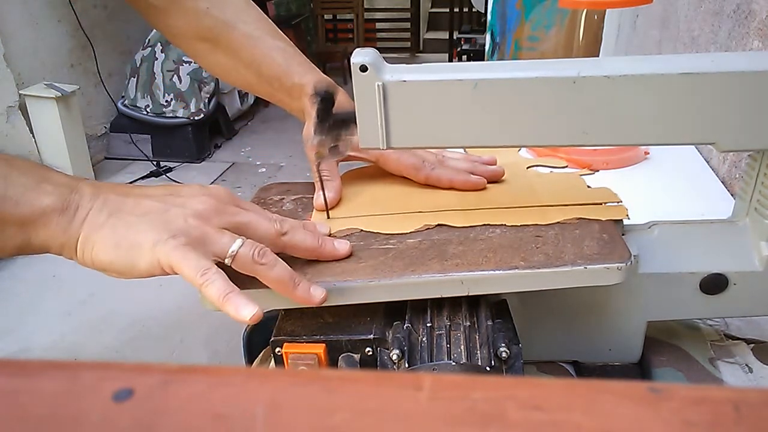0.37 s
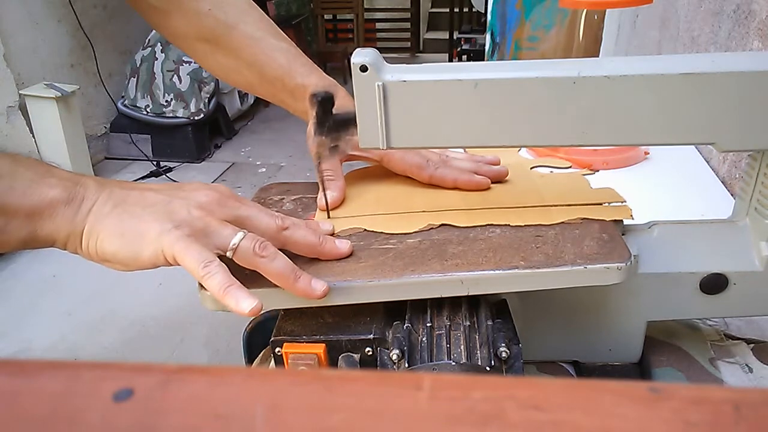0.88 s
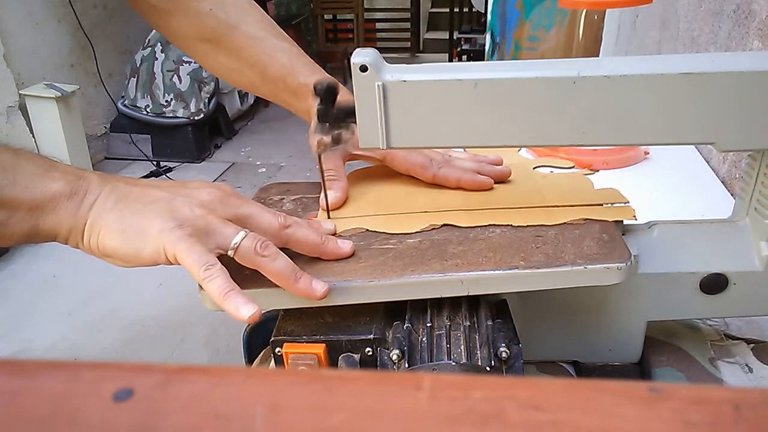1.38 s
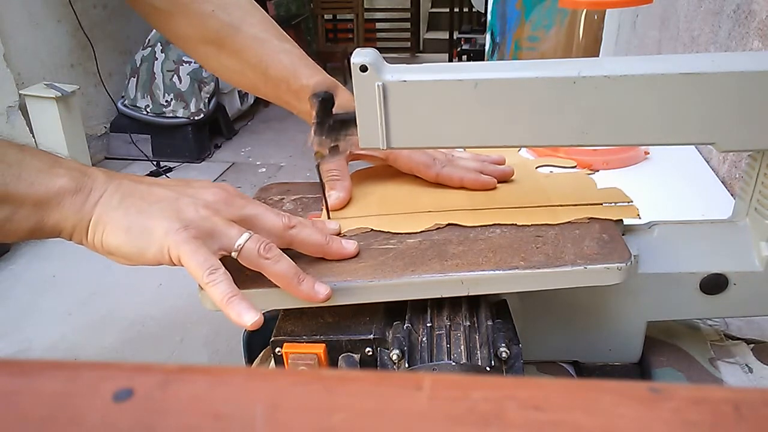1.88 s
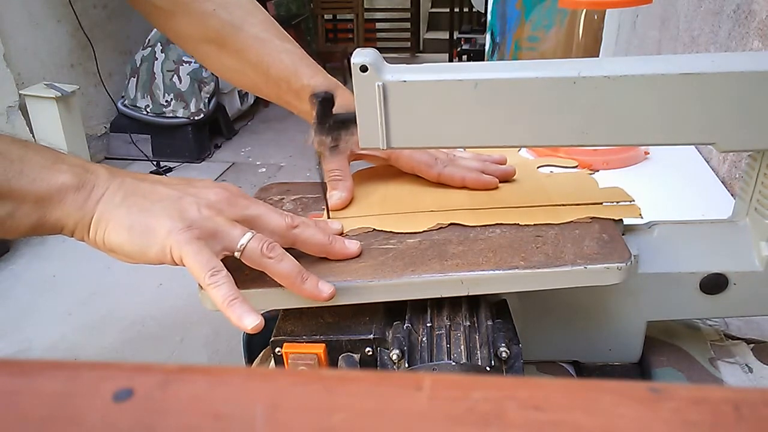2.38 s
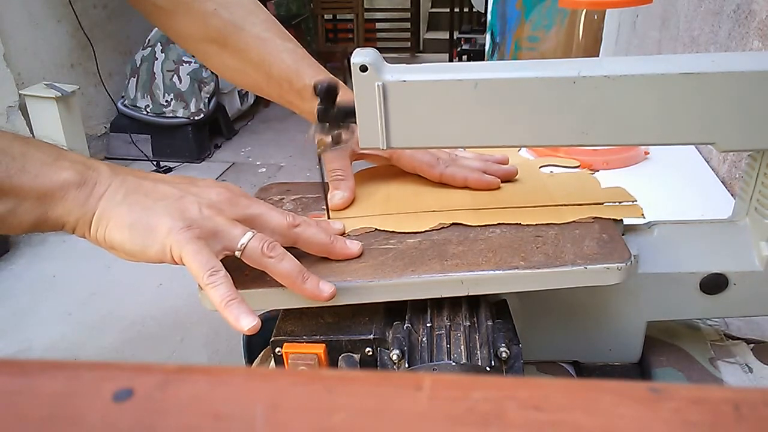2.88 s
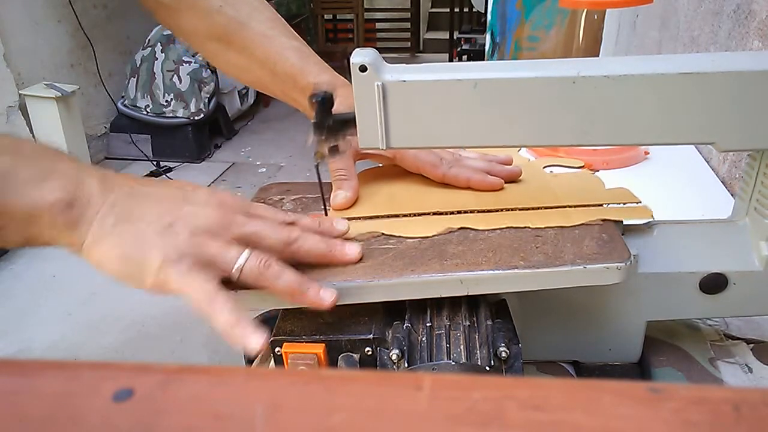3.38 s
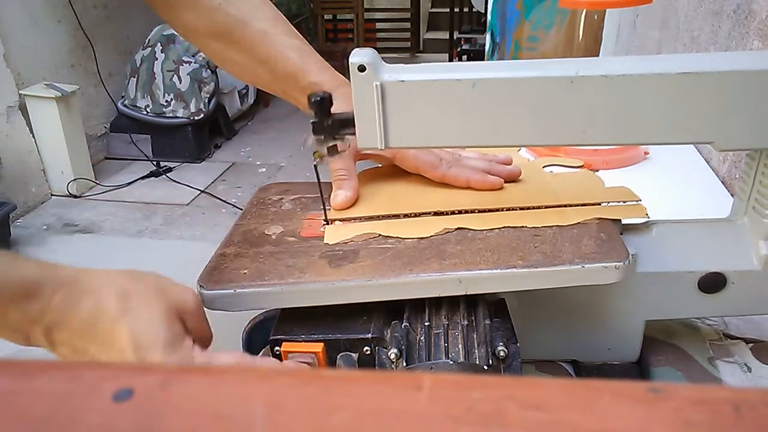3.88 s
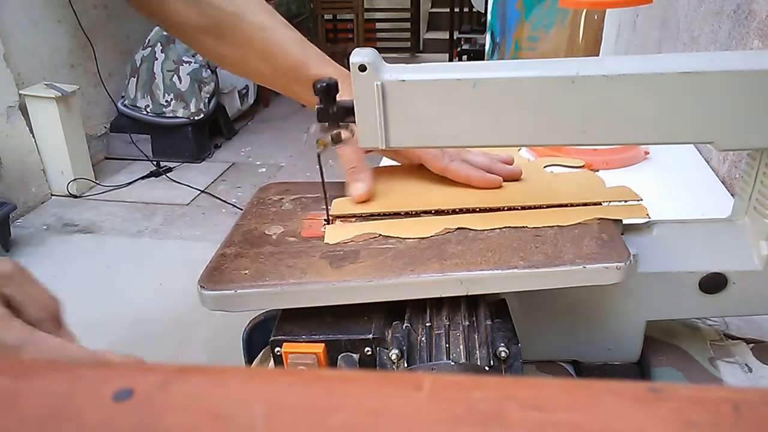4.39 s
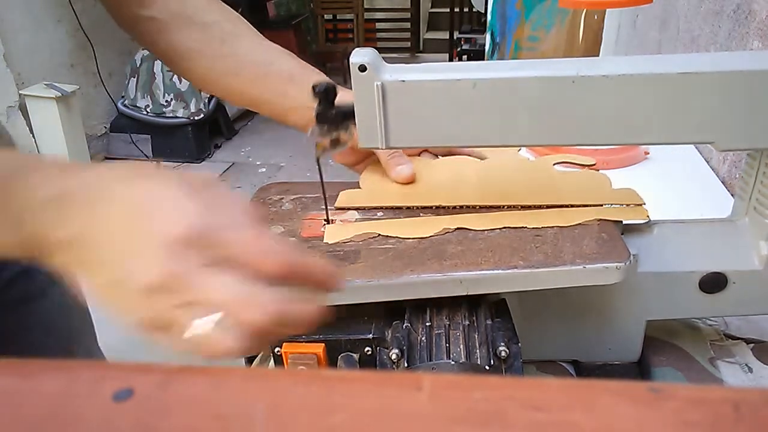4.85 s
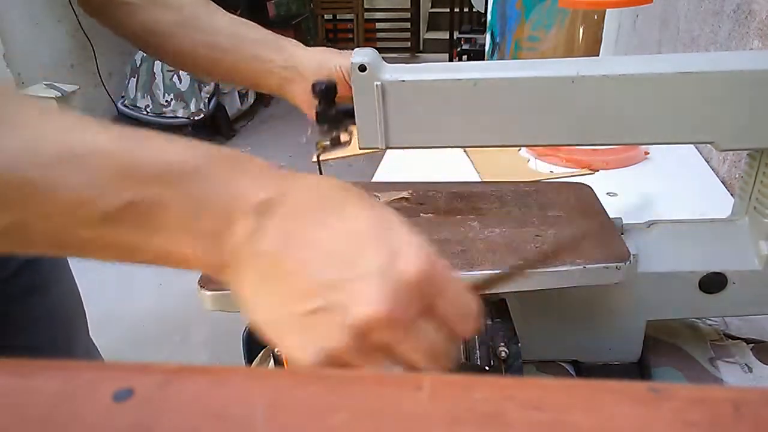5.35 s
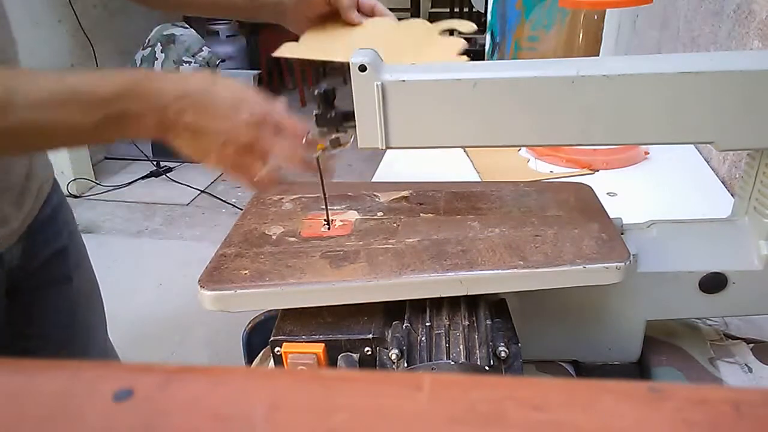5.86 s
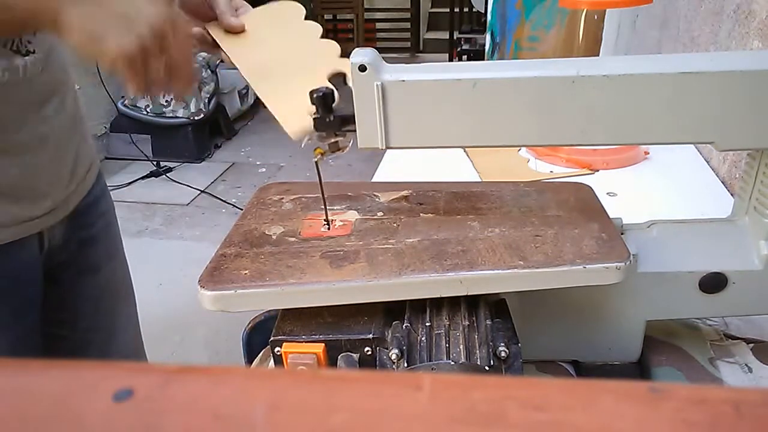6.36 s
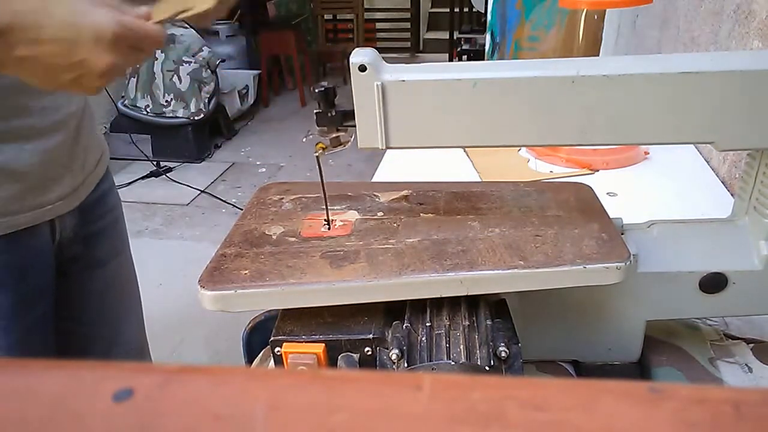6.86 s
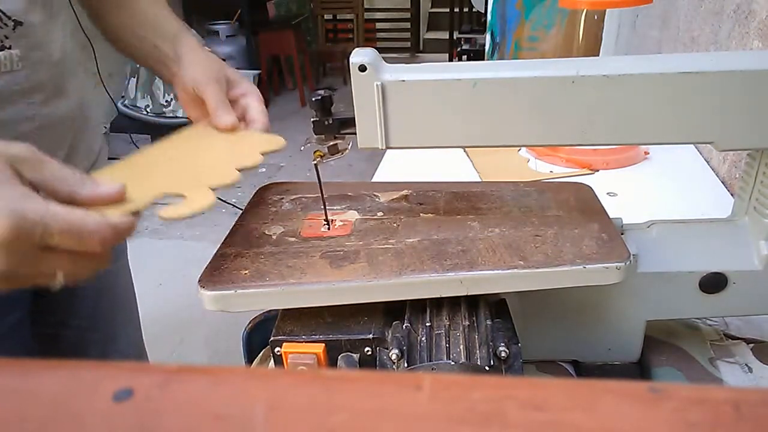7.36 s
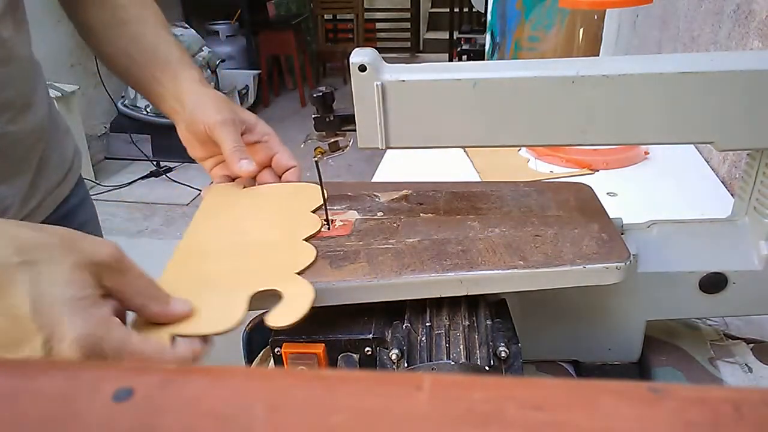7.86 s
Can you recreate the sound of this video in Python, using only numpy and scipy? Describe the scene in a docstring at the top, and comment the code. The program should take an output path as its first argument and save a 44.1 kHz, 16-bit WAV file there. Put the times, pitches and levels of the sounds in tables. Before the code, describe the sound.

From 0 to 1.9 s a bench scroll saw cuts thin plywood close to the microphone: about 29 strokes a second fuse into a rough, loud buzz of board slaps, arm knocks, blade ringing and toothy rasp, its force and hum fluctuating. From 1.9 to 2.5 s it runs free, with bright metal clatter and motor whirr. At 2.5 s it is switched off; the pitch drops and the clacks separate, slowing and fading until about 4.3 s, with a small dull knock at 4.45 s. Then it is quiet, with a faint low outdoor murmur. A light knock at 4.95 s, a sharper knock and gritty wood slide at 5.2 s, a softer rub near 5.5 s, and faint ticks at 5.8 and 6.3 s follow. A distant hoarse bird whistles from 5.9 s, with a falling note at 7.2 s and short chirps near 7.7 s. Hollow board knocks land at 7.1 s. Short workshop reverberation.

```python
"""Scroll saw, handled board and a bird

A bench scroll saw cuts plywood, runs free, is switched off and its crank winds down with slowing clacks.
Impulses and noise excite decaying modes of board, arm, blade and frame; filtered noise gives rasp and whirr.
Hands then slide and knock the board (gritty noise and modes) while small metal parts tick.
A bird whistles outside (gliding sines with echoes) over a low murmur; a noise suppressor thins the quiet."""
import sys
import numpy as np
from scipy import signal
from scipy.fft import rfft, irfft, next_fast_len
from scipy.io import wavfile
from scipy.ndimage import uniform_filter1d

SR = 44100
rng = np.random.default_rng(int(sys.argv[2]) if len(sys.argv) > 2 else 0)


def unload_wav(signal):
    """Save mono or channel-first audio to the path in sys.argv[1] as 16-bit WAV at rate SR, clipped to [-1, 1]."""
    wavfile.write(
        sys.argv[1],
        SR,
        np.round(np.clip(np.atleast_2d(signal).T, -1, 1) * 32767).astype(np.int16),
    )


def gain_from_decibels(decibels):
    """Convert decibel values to linear amplitude factors."""
    exponent = np.asarray(decibels, float) / 20
    return 10 ** exponent


N = 352359
T = np.arange(N) / SR  # time [s]

# crank speed: steady under load, a little faster free, a sharp drop at switch-off, then coasting:
# (time [s], speed [turns/s])
CRANK_SPEED = [(0, 28.69), (1.9, 28.69), (2.49, 28.95), (2.53, 19.89), (2.7, 18.03), (3.1, 14.35),
               (3.5, 11.6), (3.73, 10.0), (3.85, 9.6), (4.2, 7.25), (4.6, 6.9)]
# modes of the cast frame: (frequency [Hz], relative level [dB], t60 [s])
LOW_FRAME_MODES = [(836, -8, 0.15), (895, -10, 0.15), (1264, -9, 0.04), (1600, -4, 0.04), (1860, 1, 0.08),
                   (2155, 5, 0.09), (2230, 0, 0.05), (2470, 0, 0.07)]  # rung by every blow in the linkage
CLACK_FRAME_MODES = [(4360, 0, .1), (4500, -5, .05), (4850, -4, .07), (5100, -3, .05), (5280, -1, .09),
                     (5670, -7, .07), (6270, -9, .06), (6540, -5, .1), (6940, -10, .06), (7300, -6, .05),
                     (7450, -3, .08), (8390, -13, .06), (10100, -24, .1)]  # rung by the clacks
REBOUND_FRAME_MODES = [(3150, -2, .11), (3570, -3, .07), (3800, -2, .1), (4600, -7, .07), (5900, -10, .06)]  # rung by the rebounds and stray rattles
CUT_ENDS_TURN = 54  # turns of the crank spent cutting
CLACK_TURN = 0.38  # place of the clack on the crank [turns]


def evened(x):
    """Normalisation: scales a signal to an rms of 1."""
    return x / np.sqrt(np.mean(x ** 2) + 1e-20)


def level(rows, column):
    """Envelope: the gain along one dB column, silent outside the table."""
    rows = np.array(rows)
    return gain_from_decibels(np.interp(T, rows[:, 0], rows[:, column], -200, -200))


def coloured(x, points):
    """Spectral shaping: weights x by (frequency [Hz], level [dB]) points, to an rms of 1."""
    hz, db = np.transpose(points)
    size = next_fast_len(N)
    bins_hz = np.fft.rfftfreq(size, 1 / SR)
    gain = gain_from_decibels(np.interp(np.log(bins_hz + 1), np.log(hz + 1), db))
    return evened(irfft(rfft(x, size) * gain, size)[:N])


def band(x, lo_hz, hi_hz):
    """Band limitation: a steep band-pass, to an rms of 1."""
    sos = signal.butter(3, [lo_hz, hi_hz], "band", fs=SR, output="sos")
    return evened(signal.sosfilt(sos, x))


def ring(x, modes):
    """Modal resonance: convolves the excitation with a sum of exponentially decaying sines."""
    t = T[:SR // 3]
    response = sum(gain_from_decibels(db - 60 * t / t60) * np.sin(2 * np.pi * hz * t) for hz, db, t60 in modes)
    return signal.oaconvolve(x, response)[:N]


def blows(times, db, rise_s=0., fall_s=1e-5):
    """Impulsive excitation: an envelope rises and falls at each time, by default a single click."""
    train, t = np.zeros(N), T[:SR // 3]
    places = np.clip(np.round(np.asarray(times) * SR).astype(int), 0, N - 1)
    np.add.at(train, places, gain_from_decibels(db))
    rise = np.minimum((t * SR + 1) / (rise_s * SR + 1), 1)
    return signal.oaconvolve(train, rise * np.exp(-t / fall_s))[:N]


def strike(times, db, modes, uneven_db, fall_s, rise_s=0.0019):
    """Contact chatter: each blow is a short lumpy rattle that wakes every mode by a different amount."""
    spread = uneven_db * rng.standard_normal((len(times), len(modes)))
    a, b = rng.standard_normal((2, N))
    rattle = evened(a * gain_from_decibels(3 * evened(uniform_filter1d(b, size=50))))
    return sum(ring(rattle * blows(times, db + spread[:, k], rise_s, fall_s), [mode])
               for k, mode in enumerate(modes))


def patchy(x, depth_db, bins, frames):
    """Spectral fluctuation: raises and lowers random patches of time and frequency."""
    z = signal.stft(x, nperseg=512)[2]
    patches = uniform_filter1d(rng.standard_normal(z.shape), size=bins, axis=0)
    patches = evened(uniform_filter1d(patches, size=frames, axis=1))
    return evened(signal.istft(z * gain_from_decibels(depth_db * patches), nperseg=512)[1][:N])


def gritty_noise():
    """Stick-slip friction: noise whose loudness fluctuates within milliseconds."""
    lumps = evened(uniform_filter1d(rng.standard_normal(N), size=60))
    return rng.standard_normal(N) * gain_from_decibels(4 * lumps)


def tail(x, t60):
    """Diffuse reverberation: dense reflections decay exponentially, the treble twice as fast."""
    t = T[:SR // 2]
    a, b = rng.standard_normal((2, len(t))) * (t > .004)
    dull = uniform_filter1d(a, size=5) * gain_from_decibels(-60 * t / t60)
    bright = .8 * b * gain_from_decibels(-60 * t / (.5 * t60))
    taps = dull + bright
    return signal.oaconvolve(x, taps / np.linalg.norm(taps))[:N]


def crank_turns():
    """Kinematics: the turns made by the crank are the integral of its speed."""
    return np.cumsum(np.interp(T, *np.transpose(CRANK_SPEED))) / SR


def at_turns(turns):
    """Inverse kinematics: the times at which the crank reaches given numbers of turns."""
    return np.interp(turns, crank_turns(), T)


def cutting():
    """Periodic impact: each stroke slaps the board down and the arm knocks a third of a turn later."""
    # how hard the board slaps the table as the hands press and ease: (time [s], relative level [dB])
    slap_force = [(0, -8), (.11, -15), (.2, 3), (.44, 0.5), (.53, -1), (.62, -1), (.83, 1.5), (.93, -5),
                  (1.0, -2.5), (1.13, -4.5), (1.25, 0.5), (1.36, 0), (1.45, -4.5), (1.67, 2), (1.72, -6),
                  (1.85, -1.5), (1.9, -13.5)]
    # while cutting: (time [s], steady board ring [dB], steady arm ring [dB], teeth [dB]), all relative
    cut_levels = [(0.0, -10.5, -21, -18), (0.202, -28, -19.5, -22.5), (0.39, -19, -24.5, -20.5),
                  (1.042, -34, -21.5, -22.5), (1.486, -26.5, -24, -21), (1.656, -20, -19, -20),
                  (1.92, -28.5, -30, -22.5)]
    slap_turn = 0.94  # place on the crank
    slaps = at_turns(np.arange(CUT_ENDS_TURN) + slap_turn)
    chance = rng.standard_normal((len(slaps), 3))
    slap_db = np.interp(slaps, *np.transpose(slap_force)) + 1.2 * chance[:, 0]
    knock_s = slaps + .0122 + .0004 * chance[:, 1]
    knock_db = -5.5 + 0.77 * slap_db + 1.5 * chance[:, 2]
    slapping = blows(slaps - .0022, slap_db, .003, .003)
    knocking = blows(knock_s - .0005, knock_db - 1, .0008, .0014)
    out = board(slaps, knock_s, knock_db, level(cut_levels, 1)) + table_hum()
    out += arm(slaps, slap_db, knock_s, knock_db, level(cut_levels, 2))
    return out + blade(slapping, knocking) + teeth(slapping, knocking, knock_s, level(cut_levels, 3))


def board(slaps, knock_s, knock_db, steady):
    """Plate modes: drops onto the table and steady noise make the board boom."""
    # the board lifts off the table and drops back: (time [s], relative level [dB])
    thud_force = [(0, -10.5), (.15, -4.5), (.22, 2.5), (.55, -1), (.85, -0.5), (.92, -7.5), (1.05, -1),
                  (1.12, -7), (1.17, -6.5), (1.22, 1), (1.45, -1), (1.5, -4), (1.67, -0.5), (1.72, -16.5),
                  (1.78, -10.5), (1.82, -8), (1.9, -8.5)]
    # modes of the board: (frequency [Hz], relative level [dB], t60 [s])
    board_modes = [(303, -7, 0.15), (588, -7, .06), (657, -7, 0.08), (762, -3, 0.05), (822, 0, 0.07),
                   (990, -9, 0.06), (1233, -14, 0.05)]
    thud_db = np.interp(slaps, *np.transpose(thud_force))
    thud = blows(slaps - .0005, thud_db, .0004, .0003) + blows(knock_s, knock_db - 8, .0004, .0003)
    boom = 0.03 * ring(band(thud, 630, 2700) * thud.std(), board_modes)
    noise = band(rng.standard_normal(N), 400, 3000)
    return boom + 0.27 * evened(ring(noise, board_modes)) * steady


def table_hum():
    """Harmonic of rotation: the table hums on the twelfth multiple of the crank speed."""
    # (time [s], peak level [dB])
    hum_levels = [(0, -52.5), (.3, -47), (.4, -34), (.72, -39.5), (1.0, -33), (1.15, -36), (1.33, -42.5),
                  (1.38, -29.5), (1.65, -32), (1.72, -44.5), (1.84, -44), (1.88, -25.5), (1.95, -81),
                  (2.3, -37), (2.4, -36.5), (2.5, -39)]
    return np.sin(2 * np.pi * 12 * crank_turns()) * uniform_filter1d(level(hum_levels, 1), size=500)


def arm(slaps, slap_db, knock_s, knock_db, steady):
    """Beam modes: sharp knocks, slap noise and steady noise ring the saw's arm."""
    # modes of the arm: (frequency [Hz], relative level [dB], t60 [s])
    arm_modes = [(1527, -7.5, 0.046), (1760, -8.5, 0.041), (1838, 3.5, 0.031), (1906, -7, .05),
                 (2133, -2.5, 0.046), (2400, -3.5, 0.042)]
    noise = rng.standard_normal(N)
    hits = 0.6 * blows(knock_s, knock_db, .00006, .00007)
    hits += 0.021 * band(noise, 500, 6000) * blows(slaps - .0015, slap_db, 0.00039, 0.0058)
    return 0.22 * ring(hits, arm_modes) + 0.62 * evened(ring(noise, arm_modes)) * steady


def blade(slapping, knocking):
    """Damped resonance: bursts of noise ring the blade, wider resonances dying sooner."""
    # resonances of the blade: (frequency [Hz], bandwidth [Hz], relative level [dB])
    blade_resonances = [(3630, 420, -6), (4350, 510, -5), (4683, 280, -1), (5200, 300, -8),
                        (6060, 360, -7.5), (6840, 2000, -27.5), (10000, 600, -18.5)]
    modes = [(hz, db, np.log(1000) / np.pi / width) for hz, width, db in blade_resonances]
    noise = band(rng.standard_normal(N), 1400, 10000)
    return 0.13 * ring(0.62 * noise * (slapping + 0.44 * knocking), modes)


def teeth(slapping, knocking, knock_s, steady):
    """Modulated friction noise: the teeth rasp through the wood and bite on the way down."""
    # spectrum of the rasp: (frequency [Hz], relative density [dB per Hz])
    rasp_spectrum = [(50, -25), (120, -20.5), (200, -35.5), (340, -8.5), (450, -22.5), (800, -3.5),
                     (1150, -4), (1830, 0), (2700, -3.5), (4750, -7), (7500, -15), (10900, -33.5),
                     (12000, -38), (15500, -37)]
    downstroke = .65 + .9 * blows(knock_s, 0., .003, .01)
    rasp = .3 * (slapping + 2.0 * knocking) + 1.01 * downstroke * steady
    return coloured(rng.standard_normal(N), rasp_spectrum) * rasp


def air():
    """Shaped random noise: a distant low outdoor murmur in drifting patches."""
    # spectrum of the murmur: (frequency [Hz], relative density [dB per Hz])
    murmur_spectrum = [(59, -4.5), (120, 10.5), (190, -13), (248, -5), (331, -6), (453, -0.5), (571, -9),
                       (684, -5), (810, -16), (914, -8), (1800, -43), (2340, -71.5), (3960, -120)]
    # (time [s], rms level [dB])
    murmur_levels = [(4.299, -57), (4.67, -58.5), (5.06, -60.5), (5.39, -58.5), (5.6, -61.5), (6.14, -60.5),
                     (6.32, -56), (6.659, -57.5), (7.29, -56.5), (7.56, -57.5), (7.99, -54)]
    murmur = patchy(coloured(rng.standard_normal(N), murmur_spectrum), 3.5, bins=2, frames=24)
    return murmur * gain_from_decibels(np.interp(T, *np.transpose(murmur_levels)))


def whirr():
    """Rotational noise: bearings and motor whirr, loudest just after each clack."""
    # bearings and motor: (time [s], low band [dB], middle band [dB], high band [dB]), all relative
    running_levels = [(1.8, -25, -13, -12.5), (1.87, -30, -25.5, -31), (2.34, -29.5, -21, -25.5),
                      (2.66, -35, -30, -34.5), (2.99, -40, -33, -37), (3.78, -44.5, -41.5, -46.5),
                      (4.01, -45.5, -45.5, -50), (4.22, -54.5, -59.5, -101), (4.5, -69, -75.5, -80.5)]
    # spectrum of the whirr: (frequency [Hz], relative density [dB per Hz])
    whirr_spectrum = [(40, -29), (95, -10), (135, 24.5), (200, -17.5), (326, 9), (403, -10), (791, 5.5),
                      (1110, -1.5), (1840, -0.5), (2520, 5), (2810, -23), (4280, -18), (6950, -27),
                      (11500, -51.5), (15500, -38)]
    noise = rng.standard_normal(N)
    frame_modes = LOW_FRAME_MODES + CLACK_FRAME_MODES + REBOUND_FRAME_MODES
    noise = noise + 0.18 * evened(ring(noise, frame_modes))
    noise = patchy(coloured(noise, whirr_spectrum), 1.83, bins=4, frames=3)
    through = (crank_turns() - CLACK_TURN) % 1  # share of the turn since the clack
    noise *= gain_from_decibels(uniform_filter1d(-13 * through, size=200))  # sags 13 dB through the turn
    bands_hz = [(45, 2560), (1300, 3440), (2900, 20000)]
    return 1.24 * sum(band(noise, *edges) * level(running_levels, k + 1)
                      for k, edges in enumerate(bands_hz))


def linkage():
    """Impact with clearance: slack clacks once a turn, rebounds and rattles; weak blows are duller."""
    # (time [s], bright clack [dB], dull clack [dB], dull rebound [dB]), all relative
    slack_levels = [(1.92, -17, -31, -16.5), (2.04, -15.5, -38, -11), (2.12, -14, -5, -11),
                    (2.232, -17.5, -31, -21), (2.4, -14, -10, -6), (2.5, -17.5, -24, -15),
                    (2.62, -17.5, -22, -27), (3.0, -20, -23, -13.5), (3.4, -23, -25.5, -21.5),
                    (3.78, -26.5, -22.5, -28.5), (3.89, -25.5, -25, -27), (4.0, -37, -38, -28.5),
                    (4.12, -32.5, -42, -32.5), (4.255, -36.5, -42, -41), (4.4, -47, -69, -56)]
    last_turn = 96
    turns = np.arange(CUT_ENDS_TURN + 1, last_turn) + CLACK_TURN
    chance = rng.standard_normal((len(turns), 8)).T
    clacks = at_turns(turns)
    # a rebound comes 0.439 turn later, or after 41 ms if that is sooner, with some scatter
    rebounds = np.minimum(at_turns(turns + 0.439), clacks + 0.041) + 0.0048 * chance[0]
    rattles = at_turns(turns + .35 + .3 * np.tanh(chance[1]))  # one at a chance place in every turn
    at, *columns = np.transpose(slack_levels)
    bright, dull, back = (np.interp(clacks, at, db) for db in columns)
    soft = bright + 0.092 * (bright - bright.max())  # weak rebounds lose more treble
    times = np.r_[clacks, rebounds, rattles]
    bright_db = np.r_[bright, soft - 3, soft - 5.5] + 1.5 * chance[2:5].ravel()
    dull_db = np.r_[dull, back, back - 10] + 1.5 * chance[5:].ravel()
    return frame(times, bright_db, dull_db, len(turns)) + crack(times, bright_db)


def frame(times, bright_db, dull_db, clack_count):
    """Modal excitation: short rattling blows, the clacks listed first, ring the cast frame."""
    n = clack_count
    out = 0.014 * strike(times[:n], bright_db[:n], CLACK_FRAME_MODES, 7.0, 0.0021)
    out += 0.0059 * strike(times[n:], dull_db[n:], REBOUND_FRAME_MODES, 3.2, 0.0066)
    return out + 0.041 * strike(times, dull_db, LOW_FRAME_MODES, 2.5, 0.004, rise_s=0.006)


def crack(times, bright_db):
    """Nonlinear contact: the noise burst grows faster than the blow, the top treble fastest."""
    noise = rng.standard_normal(N)
    low = band(band(noise, 1100, 5100), 1500, 9000) * blows(times, 1.8 * bright_db, 0.0022, 0.01)
    high = band(noise, 4200, 10630) * blows(times, 2 * bright_db, 0.001, 0.0075)
    return 2.0 * low + 0.43 * high


def lone_modes():
    """Free vibration: single modes ring on after a click."""
    # (time [s], level [dB], frequency [Hz], t60 [s])
    free_modes = [(4.387, -64, 5280, .14), (4.427, -68, 4850, .12), (4.455, -55, 1190, .42),
                  (6.246, -70, 4608, .35), (7.1213, -37, 834, .36), (7.14, -41, 1992, .12),
                  (7.14, -50, 4468, .1), (7.14, -63, 6363, .5), (4.72, -62, 1850, .1)]
    return sum(ring(blows(at, db), [(hz, 0, t60)]) for at, db, hz, t60 in free_modes)


def crank_stop():
    """Impact on a resonant body: the crank drops to rest against the bench."""
    # (time [s], relative level [dB])
    stop_blows = [(4.425, -43.5), (4.4565, -33), (4.464, -36), (4.479, -38)]
    # modes of the bench: (frequency [Hz], relative level [dB], t60 [s])
    bench_modes = [(297, -13, .25), (345, -18, .2), (458, -4, .13), (560, -7, .1), (650, 0, .15),
                   (760, -7, .1), (840, -6, .17), (890, -5, .13), (1190, -9, .3)]
    return 0.1 * ring(blows(*np.transpose(stop_blows), 0.000089, .0001), bench_modes)


def ticks():
    """Lightly damped modes: small metal parts tick, each with a dry puff of noise."""
    # (time [s], relative ring level [dB], dry puff level [dB])
    tick_blows = [(4.72, -66, -54.5), (4.886, -64, -55), (5.792, -63.5, -57), (5.823, -60, -59),
                  (6.2647, -55, -74), (6.295, -49, -61), (6.33, -55, -66), (6.365, -57, -70),
                  (7.141, -60, -45)]
    # modes of the metal parts: (frequency [Hz], relative level [dB], t60 [s])
    tick_modes = [(1168, -9, .3), (1631, -3, .25), (2051, 0, .3), (2200, -6, .2), (2977, -3, .2),
                  (3520, -2, .16), (4090, -5, .15), (4608, -2, .16), (5900, -6, .1), (5965, -2, .26),
                  (6350, -10.5, .16), (6700, -6, .13)]
    times, ring_db, puff_db = np.transpose(tick_blows)
    puffs = band(rng.standard_normal(N), 1500, 7200) * blows(times, puff_db, 0.0012, 0.023)
    return 0.017 * strike(times, ring_db, tick_modes, 2, .022) + puffs


def airy_hiss():
    """High-band noise: a thin hiss swells and fades."""
    # (start [s], swell [s], fade [s], relative top level [dB])
    hisses = [(4.845, .01, .1, -75), (5.79, .01, .16, -75.5), (5.9, .06, .16, -78)]
    shape = sum(level([(at, db - 10.5), (at + swell, db), (at + swell + fade, db - 17)], 1)
                for at, swell, fade, db in hisses)
    noise = patchy(band(gritty_noise(), 13200, 15500), 1.5, bins=3, frames=10)
    return gain_from_decibels(12) * noise * uniform_filter1d(shape, size=100)


def knocks():
    """Plate impact: each knock of the loose board is a hollow modal ring and a bright gritty puff."""
    # (time [s], puff level [dB], relative ring level [dB], puff centre [Hz], puff width [octaves])
    board_knocks = [(4.9491, -41, -73.5, 3000, 0.86), (5.1713, -39, -31.5, 2400, 2.9),
                    (5.182, -33.5, -65, 4350, 0.8), (5.4703, -54.5, -46, 4240, 0.24),
                    (5.7888, -55.5, -43.5, 6300, 0.66), (5.82, -58, -45, 6600, 0.29),
                    (7.115, -48.5, -55, 3030, 2.7), (7.122, -41.5, -30, 1840, 0.31),
                    (7.1392, -42, -33.5, 1930, 1.7)]
    # modes of the loose board: (frequency [Hz], relative level [dB], t60 [s])
    loose_modes = [(319, -5, 0.15), (456, 1, 0.28), (627, 6, 0.089), (923, 8, 0.06), (1116, 3, 0.13)]
    times, _, hollow_db, *_ = np.transpose(board_knocks)
    out = 0.036 * strike(times, hollow_db, loose_modes, 0.56, 0.0018)
    t = T[:SR // 3]
    for at, db, _, hz, octaves in board_knocks:
        a, b = rng.standard_normal((2, len(t)))
        grit = a * gain_from_decibels(4 * evened(uniform_filter1d(b, size=40)))
        half = 2 ** (octaves / 2)
        puff = band(grit, hz / half, min(hz * half, 16000))
        part = out[round(at * SR):][:len(t)]
        part += gain_from_decibels(db - 60 * t / 0.21) * puff  # t60 0.21 s
    return out


def slides():
    """Sliding friction: the edge of the board rubs, a gritty noise that swells and fades."""
    # (start [s], swell [s], fade [s], top level [dB])
    strokes = [(5.168, 0.013, 0.18, -35), (5.442, 0.092, 0.24, -48.5)]
    # spectrum of the rubbing: (frequency [Hz], relative density [dB per Hz])
    rub_spectrum = [(240, -28), (400, 4), (552, -9), (673, -7), (1360, -13.5), (2290, 0.5), (3210, -10),
                    (4920, -4.5), (8000, -8), (10000, -14.5), (12500, -17), (15500, -12.5)]
    shape = sum(level([(at, db - 14), (at + swell, db), (at + swell + fade, db - 39)], 1)
                for at, swell, fade, db in strokes)
    noise = patchy(coloured(gritty_noise(), rub_spectrum), 1.9, bins=3, frames=8)
    return noise * uniform_filter1d(shape, size=100)


def bird():
    """Frequency modulation: hoarse whistles arch and glide, heard mostly through echoes across the yard."""
    # (start [s], length [s], first pitch [Hz], last pitch [Hz], arch [Hz], relative top level [dB])
    notes = [(5.912, 0.356, 2510, 2400, 241, -59.5), (6.114, 0.073, 2420, 2170, 2.5, -60),
             (6.601, 0.1, 2494, 2428, 58, -56.5), (6.692, 0.053, 2236, 2205, -3, -54.5),
             (6.819, 0.39, 2044, 2020, 6, -63.5), (7.191, 0.47, 2860, 2105, 0.5, -50.5),
             (7.68, 0.062, 2465, 2460, 53, -62.5), (7.708, .05, 3060, 3030, -3.5, -64.5),
             (7.749, 0.067, 3150, 3090, 63, -61.5)]
    out = np.zeros(N)
    a, b = rng.standard_normal((2, N))
    warble = 1 + 0.028 * evened(uniform_filter1d(a, size=200))
    for at, length, first_hz, last_hz, arch_hz, db in notes:
        u = np.clip((T - at) / length, 0, 1)  # share of the note gone by
        glide = (first_hz - last_hz) * np.exp(-u / 0.2)
        hz = last_hz + glide + arch_hz * np.sin(np.pi * u)
        shape = level([(at, db - 1), (at + 0.23 * length, db), (at + length, db - 23.5)], 1)
        out += uniform_filter1d(shape, size=600) * np.sin(2 * np.pi * np.cumsum(hz * warble) / SR)
    out *= gain_from_decibels(3.5 * evened(uniform_filter1d(b, size=250)))  # hoarseness
    return 0.24 * out + tail(out, 0.38)


def scene():
    """Superposition: saw and hands reverberate in the workshop, bird and murmur add from outside."""
    near = cutting() + whirr() + linkage() + lone_modes() + crank_stop()
    near += ticks() + airy_hiss() + knocks() + slides()
    room = gain_from_decibels(-14) * tail(near, 0.2)
    return (near + room + bird() + air())[None]


def suppressed(x):
    """Spectral expansion: weak bins are lowered by up to 21 dB while strong narrow lines pass."""
    threshold_db, slope, release_db_per_s = -74.0, 1.9, 99
    z = signal.stft(x, nperseg=512, noverlap=384)[2]
    power = uniform_filter1d(abs(z) ** 2, size=9, axis=2)
    power_db = 10 * np.log10(uniform_filter1d(power, size=2, axis=1) + 1e-16)
    # the followed power rises at once and falls at the release rate
    fall = np.arange(z.shape[2]) * 128 / SR * release_db_per_s
    power_db = np.maximum.accumulate(power_db + fall, axis=2) - fall
    z = z * gain_from_decibels(-np.clip(slope * (threshold_db - power_db), 0, 21))
    return signal.istft(z, nperseg=512, noverlap=384)[1][:, :N]


def roll_off(x):
    """The treble ends steeply here."""
    return signal.sosfilt(signal.butter(12, 16350, fs=SR, output="sos"), x)


def record(dry):
    """Channel limits: high-pass, suppressor, overload clipping, low-pass and faint hiss."""
    x = signal.sosfilt(signal.ellip(5, .5, 30, 198, "high", fs=SR, output="sos"), dry)
    x = np.clip(suppressed(x), -1, 1)
    x = signal.sosfilt(signal.ellip(9, .3, 70, 15750, fs=SR, output="sos"), x)
    hiss = gain_from_decibels(-77) * uniform_filter1d(rng.standard_normal(x.shape), size=3, axis=1)
    return roll_off(x + hiss)


dry = scene()
out = record(dry)
unload_wav(out)
```